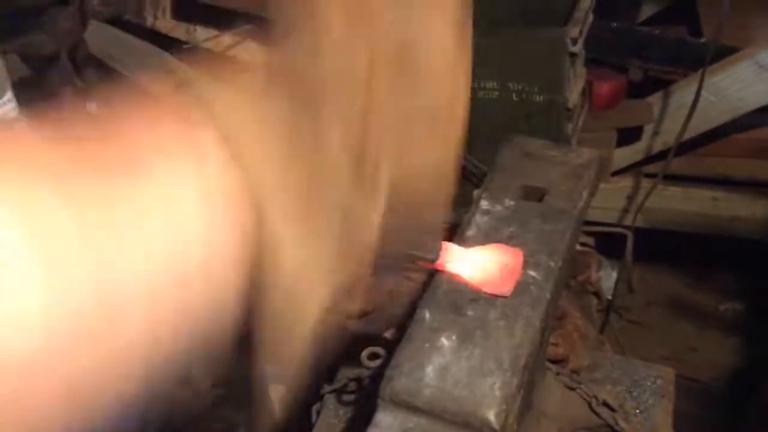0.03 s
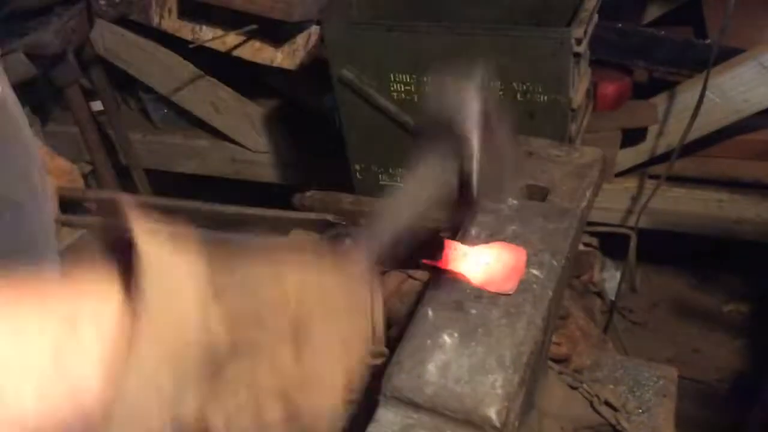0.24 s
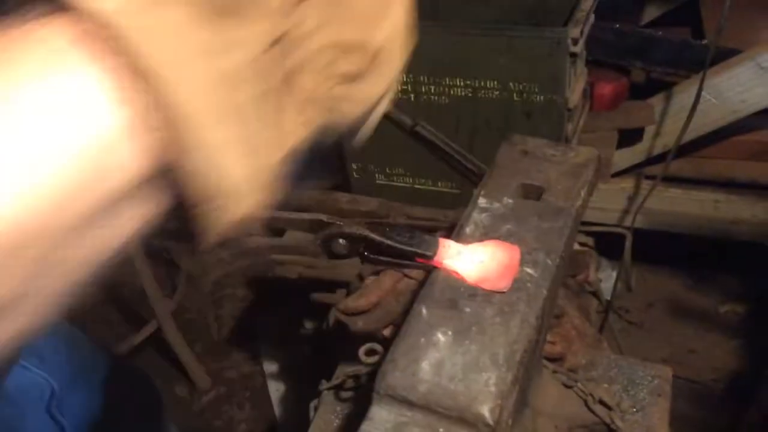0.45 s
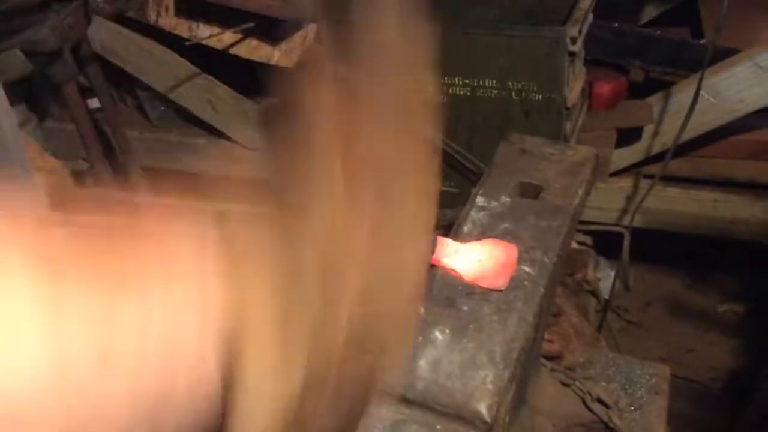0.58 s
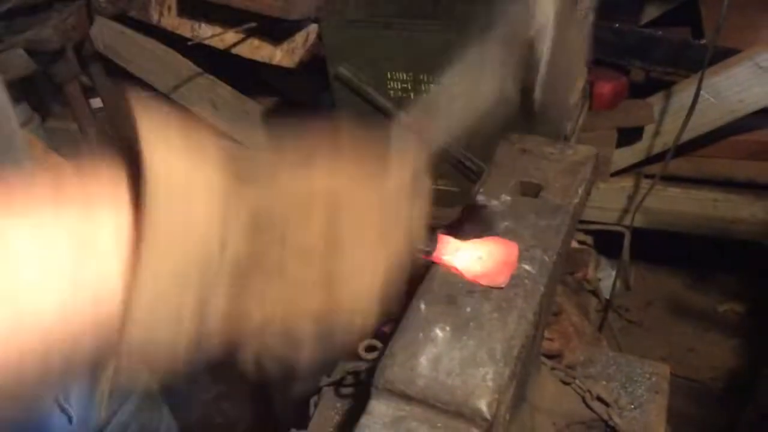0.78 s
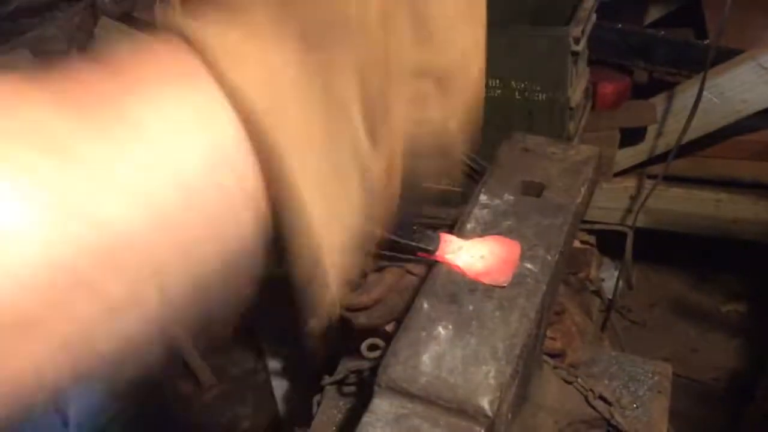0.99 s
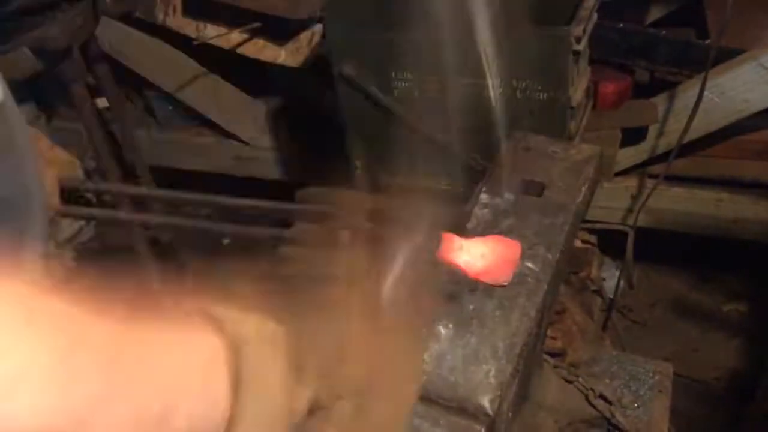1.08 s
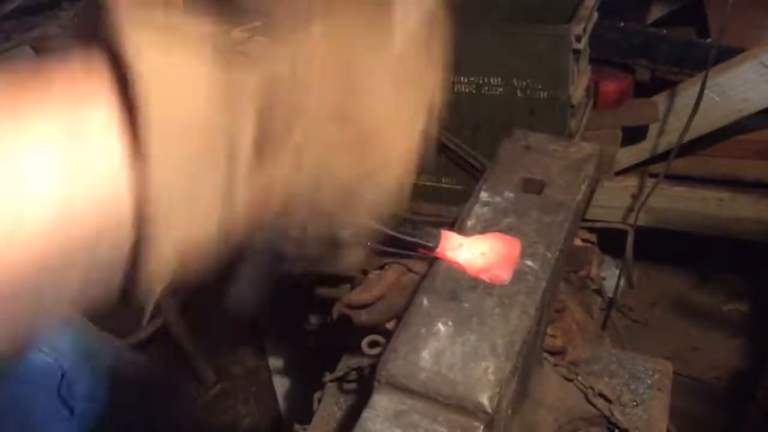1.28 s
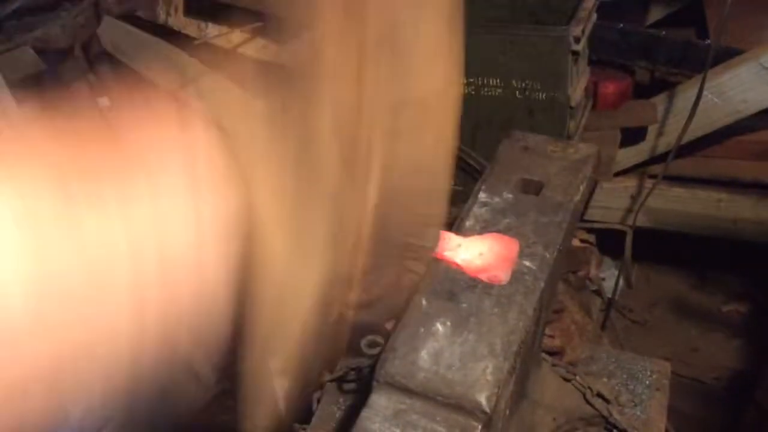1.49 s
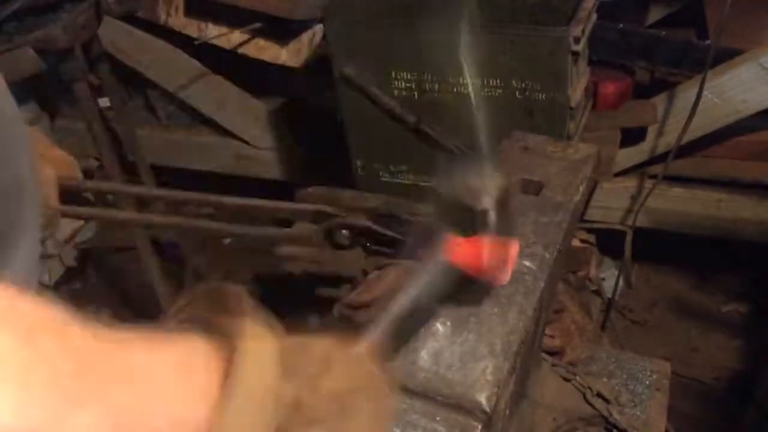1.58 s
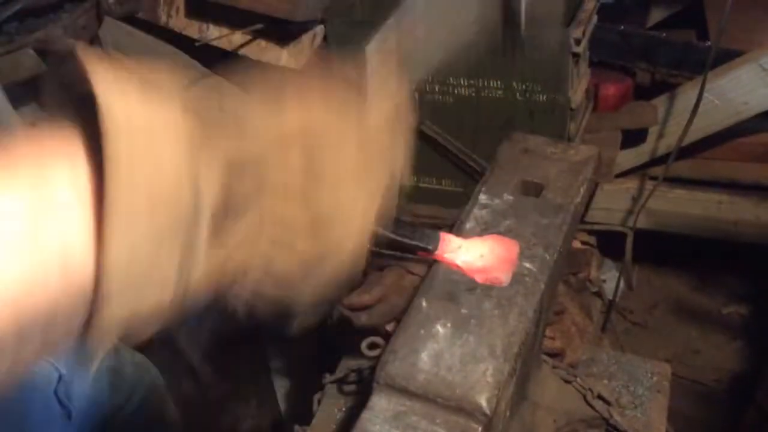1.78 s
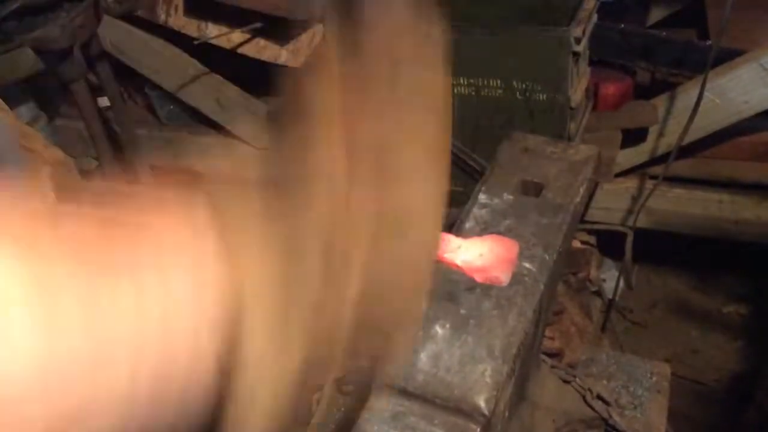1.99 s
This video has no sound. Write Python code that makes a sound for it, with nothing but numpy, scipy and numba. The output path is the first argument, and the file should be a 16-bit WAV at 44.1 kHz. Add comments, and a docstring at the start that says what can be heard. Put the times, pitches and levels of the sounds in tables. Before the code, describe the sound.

Four steady, loud metallic hammer blows on an anvil, each ringing briefly, with a forge roaring behind

```python
"""A forge workshop, close to a phone: a hand hammer strikes hot steel on an anvil four times.
Each blow snaps, cracks in noise bands, rings steel modes, rattles small clutter and thumps the stand.
The tail of a blow struck before the start opens the scene; a gas forge roars, hisses and whistles behind.
The phone's gain control ducks at each loud blow and comes back late; a limiter flattens the ring."""
import sys
import numpy as np
from scipy import signal
from scipy.fft import rfft, irfft
from scipy.io import wavfile
from scipy.ndimage import uniform_filter1d, minimum_filter1d
from numba import njit

SR = 44100
rng = np.random.default_rng(int(sys.argv[2]) if len(sys.argv) > 2 else 0)


def store_pcm(level_fs):
    """Save levels as 16-bit WAV."""
    pcm = np.round(np.clip(level_fs, -1, 1) * 32767).astype(np.int16)
    wavfile.write(sys.argv[1], SR, np.atleast_2d(pcm).T)


N = 90404  # length [samples]


def undb(db):
    """Turn dB into an amplitude gain."""
    return 10 ** (np.asarray(db) / 20)


def unit(x):
    """Scale to rms 1."""
    return x / np.sqrt(np.mean(x ** 2))


def band(x, hz, width_hz):
    """Band-pass around a centre frequency."""
    low_edge = max(hz - width_hz / 2, hz / 4)
    high_edge = min(hz + width_hz / 2, SR / 2.1)
    sos = signal.butter(2, [low_edge, high_edge], "band", fs=SR, output="sos")
    return signal.sosfilt(sos, x)


def fade(t, t60):
    """Exponential decay: silent before 0, then 60 dB down after t60 seconds."""
    return (t >= 0) * np.exp(-np.log(1000) * np.maximum(t, 0) / t60)


def swell(t, rise_s):
    """Exponential rise from 0 towards 1, with its time constant in seconds."""
    return 1 - np.exp(-np.maximum(t, 0) / rise_s)


def sine(hz, t):
    """Sine that starts its cycle at t = 0."""
    return np.sin(2 * np.pi * hz * t)


def walk(rate):
    """Random levels, drawn `rate` times a second and joined by slopes; rms 1."""
    step = int(SR / rate)
    levels = np.repeat(rng.standard_normal(N // step + 1), step)
    return unit(uniform_filter1d(levels, step)[:N])


def read_curve(hz, table, column):
    """Read a table column at any frequency, interpolated along log frequency."""
    points = np.array(table)
    return np.interp(np.log(hz), np.log(points[:, 0]), points[:, column])


@njit
def follow(x, attack, release):
    """Envelope that rises and falls at its own rates (share of the gap per sample)."""
    y, e = np.empty(len(x)), 1e-4
    for i in range(len(x)):
        e += (x[i] - e) * (attack if x[i] > e else release)
        y[i] = e
    return y


def forge():
    """Gas forge: noise shaped as flame roar that flutters in the bass, steady hiss and a breathy whistle."""
    # flame and gas colour before the roar is levelled: (frequency [Hz], spectral level [dB per Hz])
    flame_colour = [(18, -44), (30, -7.5), (202, -1.5), (389, -9), (709, -28), (1170, -24.5), (1970, -32),
                    (2760, -29.5), (4420, -46), (4780, -34.5), (6050, -49.5), (7080, -25.5), (8060, -43.5),
                    (9680, -34.5), (15500, -36)]
    roar_db, whistle_db = -36.5, -58.5
    flutter_db, flutter_hz = 2.5, 40.02
    whistle_hz, whistle_width_hz = 7200, 650

    hz = np.maximum(np.arange(N // 2 + 1) * SR / N, 1)
    colour = undb(read_curve(hz, flame_colour, 1))
    bass_share = 1 / (1 + (hz / 600) ** 4)  # share of the power

    def coloured_noise(share):
        return irfft(rfft(rng.standard_normal(N)) * colour * np.sqrt(share), N)

    bass = coloured_noise(bass_share) * undb(flutter_db * walk(flutter_hz))
    hiss = coloured_noise(1 - bass_share)
    whistle = unit(band(rng.standard_normal(N), whistle_hz, whistle_width_hz))
    return undb(roar_db) * unit(bass + hiss) + undb(whistle_db) * whistle


def ring(t, tilt, high_db):
    """Anvil and hammer modes: decaying sines that swell in, the weaker ones wavering more in level."""
    # anvil and hammer mode frequencies [Hz]
    mode_hz = [1941, 2383, 4160, 4190, 4225, 4960, 5385, 5420, 6100, 6600, 6648, 8917, 9150, 11510, 12770,
               13261, 13410, 13630]
    # the same modes before tilt, scatter and waver: (level [dB], decay time t60 [s])
    mode_decays = [(-0.5, 0.25), (-1.5, 0.24), (-13.5, 0.16), (-14.5, 0.2), (-15.5, 0.15), (-15, .1),
                   (-4, 0.079), (-22.5, .18), (-24.5, 0.21), (-39.5, 0.32), (-29, .22), (-1, .21),
                   (-26.5, 0.25), (-43, .17), (-24.5, 0.099), (-19.5, 0.31), (-36.5, .3), (-40, .5)]
    rise_s, scatter_db = 0.02, 0.8
    waver_db, waver_hz = 4.5, 70
    high_from_hz, weak_under_db = 6000, -12
    choke_s, choke_power = 0.1, 3
    rest_db, rest_t60_s = -48, 0.56

    tones, after = 0, np.maximum(t, 0)
    for k, (hz, (db, t60)) in enumerate(zip(mode_hz, mode_decays)):
        extra_db = high_db * (hz > high_from_hz and db < weak_under_db)
        scatter = scatter_db * rng.standard_normal()
        waver = waver_db * np.clip(-db / 20, 0, 1) * walk(waver_hz)
        size = undb(db + extra_db + scatter + waver)
        shape = fade(t, t60)
        if k < 2:  # the two lowest modes die ever faster, to a faint rest
            choke = np.exp(-(after / choke_s) ** choke_power)
            shape = shape * choke + undb(rest_db) * fade(t, rest_t60_s)
        tones = tones + size * tilt(hz) * shape * sine(hz, t)
    return tones * swell(t, rise_s)


def long_ring(t, long_db):
    """One long-lived mode that swells in slowly and outlasts the main ring."""
    hz, base_db, t60_s, rise_s = 4721, -40.5, 0.88, 0.04
    return undb(base_db + long_db) * fade(t, t60_s) * swell(t, rise_s) * sine(hz, t)


def clutter(t, count=320):
    """Tongs, chain and scrap: many small decaying modes strewn at random, new for every blow."""
    # typical small mode, scattered below: (frequency [Hz], level [dB], decay time t60 [s])
    small_modes = [(700, -39.5, 0.16), (1500, -42, 0.18), (3000, -33, 0.14), (5000, -31, 0.16),
                   (7500, -40.5, 0.16), (10800, -31, 0.11), (12500, -42.5, 0.19), (15400, -41, 0.085)]
    level_spread_db, low_hz, high_hz = 1.5, 700, 15400

    sounding = (t >= 0) & (t < 0.5)
    live = t[sounding]
    where, spread, phase = rng.random(count), rng.standard_normal(count), rng.random(count)
    hz = low_hz + (high_hz - low_hz) * where
    level = undb(read_curve(hz, small_modes, 1) + level_spread_db * spread)
    t60 = read_curve(hz, small_modes, 2) * undb(spread[::-1])
    # one row a mode; the phase is in cycles
    modes = fade(live, t60[:, None]) * np.sin(2 * np.pi * (hz[:, None] * live + phase[:, None]))
    out = np.zeros(N)
    out[sounding] = level @ modes
    return out


def stand_thump(t, knock_db):
    """Low thump around the blow: decaying sines, softly begun, set 11 ms before the blow time."""
    # modes of the stand before the blow's own levels: (frequency [Hz], level [dB], decay time t60 [s])
    stand_modes = [(44.5, -22, 0.06), (97.8, -14, .08), (190, -29.5, .08), (432, -23, .07),
                   (546, -23.5, .07)]
    offset_s, rise_s = 0.011, 0.0024

    thump_t = t + offset_s
    thump = 0
    for k, (hz, db, t60) in enumerate(stand_modes):
        level = undb(db + knock_db * (k >= 3))  # the highest two are the knock
        thump = thump + level * fade(thump_t, t60) * sine(hz, thump_t)
    return thump * swell(thump_t, rise_s)


def impact_crack(t, tilt):
    """Crack: bursts of band-passed noise, each band with its own decay."""
    # noise bands before tilt: (centre frequency [Hz], level [dB], decay time t60 [s])
    crack_bands = [(378, -20, 0.087), (733, -20.5, 0.097), (1206, -15.5, 0.09), (2000, -13, 0.12),
                   (2632, -1, 0.021), (3940, -11.5, 0.021), (5500, -4.5, 0.021), (7500, -18.5, .05),
                   (10000, -30, 0.021), (12500, -17, 0.017), (14500, -0.5, .05)]
    crack = 0
    for hz, db, t60 in crack_bands:
        noise = unit(band(rng.standard_normal(N), hz, hz / 2.14))
        crack = crack + undb(db) * tilt(hz) * fade(t, t60) * noise
    return crack


def impact_snap(t):
    """Snap of contact: a click of about 2 ms through a band-pass, set to a fixed peak."""
    peak_db, hz, width_hz = 7.5, 3000, 2300
    snap = band(fade(t, 0.0021), hz, width_hz)
    return undb(peak_db) * snap / max(np.abs(snap).max(), 0.01)  # the floor keeps a spent click quiet


def blow(t, thump_db, tilt_db, long_db, knock_db, high_db):
    """One blow at t = 0: steel (ring, crack, clutter, snap) and stand apart, brightness tilting about 2 kHz."""
    def tilt(hz):
        return undb(tilt_db * np.log2(hz / 2000))

    tones = ring(t, tilt, high_db) + long_ring(t, long_db)
    steel = tones + clutter(t) + impact_crack(t, tilt) + impact_snap(t)
    return steel, undb(thump_db) * stand_thump(t, knock_db)


def scene():
    """Blows over the forge; strength scales the steel, while the thump has its own level."""
    # hammer blows, the first before the start: (time [s], strength [dB], thump [dB],
    # brightness [dB per octave], long ring [dB], knock [dB], weak high modes [dB])
    blows = [(-.235, -10.5, -30, -6, 18.5, 0, 0), (0.2527, 11, 15.5, 0.2, 2.5, 6.5, -2.5),
             (0.7571, 12.5, -8.5, -0.36, -1.5, 3, -2), (1.2312, 14.5, 2.5, -1.63, -4, -6.5, 7),
             (1.6996, 12.5, 0.5, -1.32, -18, 3, -6.5)]
    t, out = np.arange(N) / SR, forge()
    for start_s, strength_db, *character in blows:
        steel, thump = blow(t - start_s, *character)
        out = out + undb(strength_db) * steel + thump
    return out[None]


def record(dry):
    """Phone: bass cut, gain control that holds its duck and returns late, fast limiter, soft clip, top cut."""
    low_cut_hz, top_hz = 55, 15350
    duck_from_db, duck_max_db = -17.5, 13
    duck_hold_s, duck_release_s = 0.21, 0.062
    duck_left_s = 0.051  # hold still running at the start
    limit_db, limit_ratio = -7.5, 24
    limit_attack_s, limit_release_s = 0.0004, 0.012
    clip = 0.6  # full-scale amplitude is 1

    x = signal.sosfilt(signal.butter(1, low_cut_hz, "high", fs=SR, output="sos"), dry[0])

    level_db = 20 * np.log10(np.abs(x) + 1e-9)
    over_db = np.clip(level_db - duck_from_db, 0, duck_max_db)
    half = int(duck_hold_s * SR / 2)
    # hold: the largest excess over the past hold time
    held_db = -minimum_filter1d(-over_db, size=2 * half + 1, origin=half, mode="constant")
    held_db[:int(duck_left_s * SR)] = duck_max_db
    duck_db = follow(held_db, 1., 1 / (duck_release_s * SR))  # ducks at once
    x = x * undb(-duck_db)

    env = follow(np.abs(x), 1 / (limit_attack_s * SR), 1 / (limit_release_s * SR))
    x = x * np.minimum(undb(limit_db) / env, 1) ** (1 - 1 / limit_ratio)
    x = clip * np.tanh(x / clip)
    return signal.sosfilt(signal.ellip(8, .2, 70, top_hz, fs=SR, output="sos"), x)[None]


dry = scene()
out = record(dry)
store_pcm(out)
```